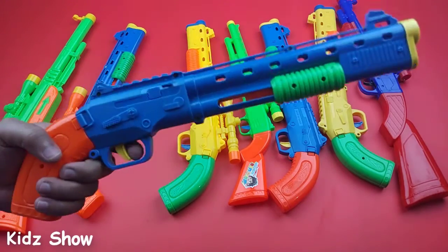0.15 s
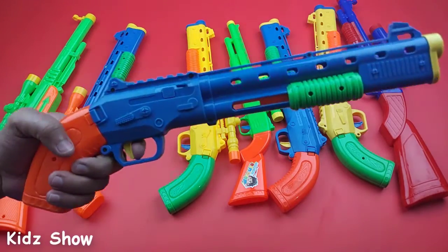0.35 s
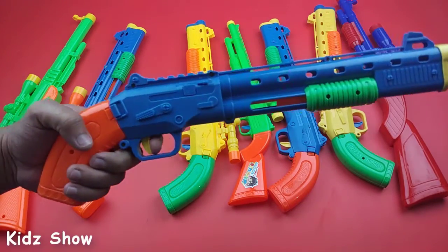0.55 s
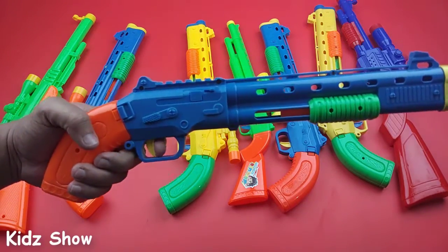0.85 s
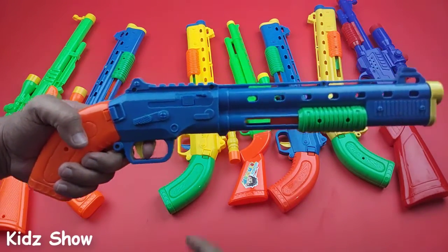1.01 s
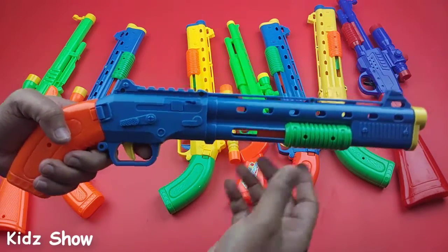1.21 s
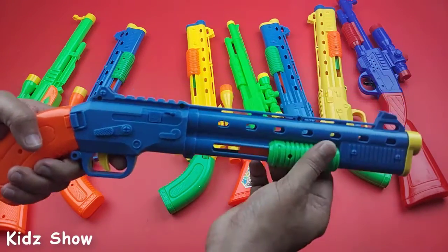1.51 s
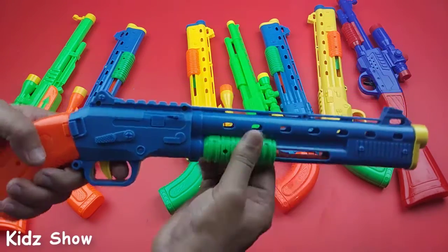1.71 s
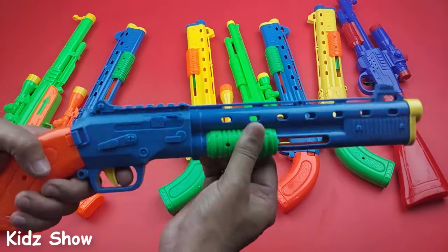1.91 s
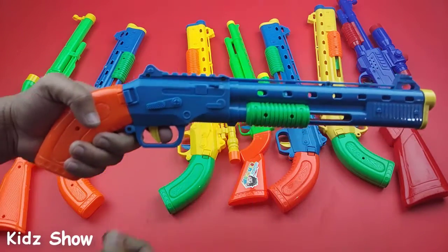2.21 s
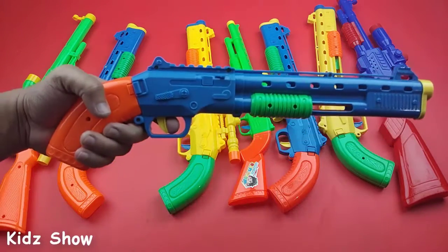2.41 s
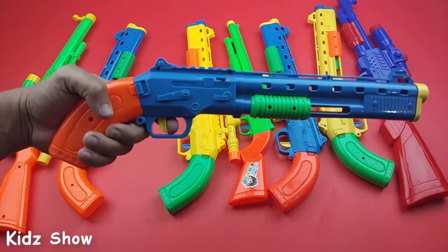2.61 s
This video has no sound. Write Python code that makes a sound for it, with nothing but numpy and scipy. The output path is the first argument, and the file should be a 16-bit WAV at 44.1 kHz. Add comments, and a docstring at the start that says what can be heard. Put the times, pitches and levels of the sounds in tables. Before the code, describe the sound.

Close stereo pickup of a toy shotgun: light loose-part ticks and soft hand rustle, a quick rasping pump stroke ending in a knock, near quiet with faint hum, then a hard spring-release crack at the end.

```python
"""Toy gun cocked and fired

A hollow plastic toy gun is handled close to two microphones: noise rustles and a loose part ticks to and fro.
Then the pump grip scrapes back, its catch clacks, the grip knocks home and the trigger lets the spring go.
Blows are noisy cracks plus fading tones; the scrape is many tiny slips. A small hard room, made of
fading noise, answers them. A wavering hum, low rumble and hiss lie underneath."""
import sys
import numpy as np
from scipy import signal
from scipy.fft import rfft, irfft
from scipy.io import wavfile
from scipy.ndimage import uniform_filter1d

SR = 44100
rng = np.random.default_rng(int(sys.argv[2]) if len(sys.argv) > 2 else 0)


def rack_gain(trim_db):
    """Turn a fader trim in dB into the linear factor to multiply a signal by."""
    fader = np.asarray(trim_db, float)
    return 10 ** (fader / 20)


def log_audio(samples):
    """Write samples as a 16-bit WAV file to the path given in sys.argv[1]."""
    # one column per channel
    frames = np.atleast_2d(samples).T
    # limit to full scale, then quantise
    limited = np.clip(frames, -1, 1)
    pcm = np.round(limited * 32767).astype(np.int16)
    wavfile.write(sys.argv[1], SR, pcm)


N = 121275  # length in samples
SPAN = 2 ** 13  # samples set aside for one blow
WIDTH = 0.48  # how much each blow differs between the microphones

# contacts of the loose part: t/s, crack peak before filtering/dB, ring against crack/dB,
# place (0 front stop, 1 rear stop)
TICKS = [(0.1907, -40, -0.5, 0.19), (.3098, -42.5, -1, 0.9), (0.4684, -43, -1.3, 0.05),
         (0.5763, -38.5, -6.5, 0.86), (0.7261, -42, -1.5, 0.056), (0.8323, -40.5, -3, 0.85),
         (0.9833, -44.5, -0.5, 0.042), (1.0631, -37, -1.5, 0.97), (1.229, -42.5, -1, 0.061),
         (1.251, -56.5, 2, 0.22), (1.3512, -58, 11, 0.19), (1.556, -71, 8, 0.2), (2.579, -77, 13, 0.27)]
# contacts of catch, grip and trigger: t/s, crack peak before filtering/dB, ring against crack/dB,
# place (0 catch, 1 barrel), chatter length/s
CLACKS = [(1.769, -20, -13, 0.44, 0.00062), (1.772, -17, -3.5, 0.05, 0.001), (1.7815, -17, -6, 0.13, 0.001),
          (1.9776, -34.5, 4.5, 0.76, 0.0015), (1.981, -19.5, 0, 1, 0.00047), (1.9832, -24, 1.5, 1, 0.00047),
          (1.9866, -29, 2, 0.46, 0.0016), (2.709, -13.5, -2.5, 0.51, 0.001),
          (2.7165, -27, 2.5, 0.9, 0.0018), (2.7214, -11, -8.5, 0.47, 0.0016)]
# tones of the gun's shell: f/Hz, level struck at the catch/dB, level struck at the barrel/dB,
# time to fade by 60 dB/s
SHELL_MODES = [(550, -34, -10, 0.016), (737, -23, -4.5, 0.016), (858, -14, -1.5, 0.016),
               (1092, -21, -1, 0.02), (1208, 0, -4, .011), (1547, -8, -11, 0.017),
               (2055, -8.5, -9.5, 0.019), (2200, -6.5, -5.5, 0.012), (2383, -7, -6.5, 0.028),
               (2638, -2.5, -3, 0.021), (3110, -6.5, -3, 0.0063), (3800, -2.5, -2, 0.011),
               (5220, 4, -3, 0.0076)]


def level(x, db):
    """Scale a sound to an average (rms) level in dB."""
    return x * rack_gain(db) / np.sqrt(np.mean(x ** 2))


def colour(x, table):
    """Make some pitches louder than others, following points of f/Hz, level/dB."""
    hz, db = np.array(table, float).T
    f = np.maximum(np.fft.rfftfreq(x.shape[-1], 1 / SR), 1)
    curve = np.interp(np.log(f), np.log(hz), db, left=db[0] - 20, right=db[-1] - 20)
    return irfft(rfft(x) * rack_gain(curve), x.shape[-1])


def pair(size, side):
    """Left and right noises that share a middle and differ by a side share."""
    mid, other = rng.standard_normal((2, size))
    return mid + side * other * np.array([[1], [-1]])


def pan(db):
    """Left and right gains that lie db apart, left louder."""
    return rack_gain(np.array([[db / 2], [-db / 2]]))


def walk(rate):
    """Smooth random curve with about `rate` new values a second; its spread is about 0.7."""
    k = int(SR / rate)
    steps = np.repeat(rng.standard_normal(N // k + 1), k)
    return 0.987 * uniform_filter1d(uniform_filter1d(steps, k), k)[:N]


def fade(t, t60):
    """Steady dying away, 60 dB in t60 seconds."""
    return np.exp(-np.log(1000) * t / t60)


def hiss():
    """Microphone hiss: steady noise, separate left and right."""
    hiss_colour = [(300, -8), (1500, -8), (5000, -8), (9000, -3), (12000, 0), (14000, -1), (15300, -8),
                   (16000, -26)]  # tone of the hiss: f/Hz, level/dB
    return level(colour(rng.standard_normal((2, N)), hiss_colour), -73.5)


def rumble():
    """Low noise, nearly the same on both sides, whose level flickers."""
    rumble_colour = [(20, -60), (60, -40), (100, -24.5), (160, -12.5), (220, 0.5), (300, 1.5), (400, -2.5),
                     (520, -13), (800, -19.5), (2000, -46)]  # tone of the rumble: f/Hz, level/dB
    noise = colour(pair(N, rack_gain(-10)), rumble_colour)
    return level(noise, -63.5) * rack_gain(5 * walk(6.3))


def rustle():
    """Hands on plastic: faint noise that swells and sinks."""
    rustle_levels = [(0, -71.5), (.9, -67.5), (1.5, -71), (2.2, -71.5), (2.75, -73.5)]  # loudness of the hands: t/s, level/dB
    rustle_colour = [(500, -0.5), (1000, 0.5), (3000, -3.5), (8000, -7), (12000, -4.5)]  # tone of the rubbing: f/Hz, level/dB
    db = np.interp(np.arange(N) / SR, *np.array(rustle_levels).T) + walk(12)
    return level(colour(pair(N, 1.0), rustle_colour), 0) * rack_gain(db)


def hum():
    """Narrow tones that waver in pitch and loudness, slightly louder on the left."""
    hum_lines = [(201, 14, -62), (387, 16, -69)]  # hum tones: f/Hz, scale of the pitch wander/Hz, level before panning/dB
    out = 0
    for hz, width, db in hum_lines:
        turns = np.cumsum(hz + width / 2 * walk(29.97)) / SR
        tone = np.sin(2 * np.pi * turns) * rack_gain(3.8 * walk(21.96))
        out = out + level(tone, db) * pan(1.0)
    return out


def room(x):
    """Dense echoes made of noise bands, each fading at its own rate, the top treble fastest."""
    room_t60 = [(400, 0.51), (1000, 0.37), (3000, 0.39), (8000, 0.31), (14000, 0.12)]  # how long the room rings: f/Hz, time to fade by 60 dB/s
    build_up_s = 0.0039
    hz, t60 = np.array(room_t60).T
    t, tail = np.arange(SR // 2) / SR, 0
    noise = rng.standard_normal((2, len(t)))
    for f in 200 * 2. ** np.arange(0, 6.6, .5):  # half-octave steps
        band = colour(noise, [(f / 2 ** .5, -20), (f, 0), (f * 2 ** .5, -20)])
        tail = tail + band * fade(t, np.interp(np.log(f), np.log(hz), t60))
    tail = tail * np.clip(t / build_up_s, 0, 1) ** 2
    tail = tail / np.sqrt(np.sum(tail ** 2) / 2)  # unit energy per side, on average
    return signal.fftconvolve(x.mean(axis=0)[None], tail)[:, :N]


def spring():
    """The spring sings on after the grip knocks home: two thin tones that waver and fade slowly."""
    spring_tones = [(704, -66, 1.3), (844, -65, 1.4)]  # tones of the spring: f/Hz, level/dB, time to fade by 60 dB/s
    start_s = 1.981
    t = np.maximum(np.arange(N) / SR - start_s, 0)  # held at 0, thus silent, before the start
    out = 0
    for hz, db, t60 in spring_tones:
        out = out + rack_gain(db + 3 * walk(25.4)) * np.sin(2 * np.pi * hz * t) * fade(t, t60)
    return out


def thumps():
    """The hand's jolt at each blow reaches the microphones as a soft, quickly fading low swing."""
    push_s = 0.0098  # one half swing, also the fading time
    top_db, below_blow_db = -25, -36  # the grip of the hand damps harder jolts
    t, out = np.arange(SPAN) / SR, np.zeros(N + SPAN)
    push = np.sin(t / push_s * np.pi) * np.exp(-t / push_s)
    for s, db, *_ in CLACKS + TICKS:
        at = int(s * SR)
        out[at:at + SPAN] += rack_gain(min(db, top_db) + below_blow_db) * push
    return out[:N]


def ring(modes, t, place):
    """Fading tones, weighted by where the blow lands, a little different each time and left and right."""
    level_scatter_db, pitch_scatter = 2.5, 0.013  # pitch scatter is a share of the pitch
    hz, near_db, far_db, t60 = np.array(modes, float).T[:, :, None]
    detune, louder, side, phase = rng.standard_normal((4, len(modes), 1))
    db = near_db + np.clip(place, 0, 1) * (far_db - near_db) + level_scatter_db * louder
    hz = hz * (1 + pitch_scatter * detune)
    gain = rack_gain(db) * fade(t, t60)
    lean = WIDTH * side * np.minimum(hz / 1500, 1)  # low tones differ less between the sides
    angle = 2 * np.pi * hz * t + phase
    return np.array([np.sum(gain * np.sin(angle + s * lean), axis=0) for s in (1, -1)])


def crack(t, length, table):
    """A short noise burst; chance peaks and holes in its tone are evened out before it is coloured."""
    burst = pair(SPAN, WIDTH) * np.sqrt(t / length) * np.exp(-t / length)
    tone = rfft(np.roll(burst, SPAN // 2, axis=1))  # moved to the middle, so nothing wraps round
    even = irfft(tone / np.sqrt(uniform_filter1d(np.abs(tone) ** 2, size=60)))
    shape = np.clip(t / length, 0, 1) * np.exp(-t / (2.7 * length))
    return colour(even, table)[:, SPAN // 2:] * shape[:SPAN // 2]


def peak(x):
    """Scale so that the mean of left and right peaks at 1."""
    return x / np.abs(x.mean(axis=0)).max()


def blows(rows, modes, table, rattle_db, rattle_t60, bounces=()):
    """Each contact is a bright crack and the tones it sets ringing; bounces and loose parts' rattle join in."""
    out, t = np.zeros((2, N + 2 * SPAN)), np.arange(SPAN) / SR
    for s, db, ring_db, place, length, pan_db in rows:
        gain = rack_gain(db) * pan(pan_db)
        rattle = level(colour(pair(SPAN, 1.5), table), np.interp(place, (0, 1), rattle_db))
        at = int(s * SR)
        out[:, at:at + SPAN] += gain * rattle * fade(t, rattle_t60)
        for late, bounce_db in [(0, 0), *bounces]:
            shift, louder = rng.standard_normal(2) * (late > 0)  # only bounces vary
            at = int((s + late * (1 + 0.15 * shift)) * SR)
            body = (ring(modes, t, place) * (1 - np.exp(-t / length)))[:, :SPAN // 2]
            hit = peak(crack(t, length, table)) + rack_gain(ring_db) * peak(body)
            out[:, at:at + SPAN // 2] += gain * rack_gain(bounce_db + 2 * louder) * hit
    # the small shell sends out no bass
    return signal.sosfilt(signal.butter(4, 576, "high", fs=SR, output="sos"), out[:, :N])


def ticks():
    """The loose part hits its front and rear stops and bounces, a little louder on the left."""
    # tones of a tick: f/Hz, level at the front stop/dB, level at the rear stop/dB, time to fade by 60 dB/s
    tick_modes = [(940, -2.5, -22, 0.009), (1230, -0.5, 0.5, 0.0077), (1510, -8.5, 3, 0.0079),
                  (2056, -8.5, -14, 0.018), (2470, -8, -15, 0.0083), (3250, -29, 0, 0.0077),
                  (4580, -18.5, 3, 0.0046)]
    tick_crack = [(500, 1), (1500, -14), (3000, 0), (5000, -0.5), (7500, 1.5), (10000, -4.5),
                  (12300, -11.5), (16000, -54)]  # tone of the crack: f/Hz, level/dB
    tick_bounces = [(0.0011, -4), (0.0023, -7.5), (0.0046, -9), (0.011, -18.5)]  # nominal bounces: time after first contact/s, level/dB
    contact_s, pan_db = 0.00033, 2.6
    rows = [(*row, contact_s, pan_db) for row in TICKS]
    # rattle in dB at the front and rear stop, then its time to fade by 60 dB in s
    return blows(rows, tick_modes, tick_crack, (-16, -12.5), 0.15, tick_bounces)


def slide():
    """Grip and spring rod scrape: dense uneven slips of plastic on plastic, coloured by the shell."""
    slide_levels = [(1.669, -80), (1.689, -64), (1.715, -51.5), (1.765, -38), (1.8, -44), (1.848, -39),
                    (1.899, -49), (1.969, -57.5), (2.0, -75), (2.704, -81.5), (2.708, -25.5),
                    (2.729, -32.5), (2.75, -42)]  # loudness of the scrape: t/s, level/dB
    slide_colour = [(480, -36), (830, -0.5), (1200, -2), (1650, -9.5), (2300, 1.5), (2700, 0.5), (3400, -4),
                    (4300, -6), (9300, 0.5), (12500, -9), (15200, -13), (16200, -22)]  # tone of the rubbing: f/Hz, level/dB
    grains_per_s, grain_scatter_db = 22000, 2
    slips_per_s, slip_scatter_db, slip_db = 900, 3, -8  # larger slips that set the shell ringing
    chance, sign, size = rng.random((3, N))
    sign, size = np.sign(sign - .5), -np.log(size + 1e-9)
    grains = (chance < grains_per_s / SR) * sign * rack_gain(grain_scatter_db * size)
    rub = level(colour(level(grains, 0) + pair(N, 1.18) * 1.56, slide_colour), 0)
    slips = (chance < slips_per_s / SR) * sign * rack_gain(slip_scatter_db * size)
    shell = ring(SHELL_MODES, np.arange(SPAN) / SR, 0.49)
    rub = rub + level(signal.fftconvolve(shell, slips[None])[:, :N], slip_db)
    db = np.interp(np.arange(N) / SR, *np.array(slide_levels).T, left=-140)
    rough_db = 2.5 * (walk(60.36) + walk(330)) / 2
    return rub * rack_gain(db + rough_db)


def clacks():
    """Catch, grip and trigger strike the hollow shell, which cracks, rings and rattles."""
    clack_crack = [(290, -43), (500, -14), (1650, -3.5), (2410, -1), (4370, 1.5), (5210, -1.5), (9590, 2),
                   (15100, -6.5), (16200, -39)]  # tone of the crack: f/Hz, level/dB
    rows = [(*row, 0) for row in CLACKS]  # panned to the middle
    # rattle in dB at the catch and the barrel, then its time to fade by 60 dB in s
    return blows(rows, SHELL_MODES, clack_crack, (-20, -19), 0.23)


def ports(x):
    """The two microphone openings colour left and right in opposite ways."""
    port_tilt = [(100, 6), (500, -5), (2000, 0), (4000, 2), (8000, 2), (12000, 13), (20000, 10)]  # left against right for the gun: f/Hz, difference/dB
    return np.array([colour(side, [(hz, s * db / 2) for hz, db in port_tilt]) for side, s in zip(x, (1, -1))])


def scene():
    """Ticks, and clacks and scrape through the ports, with room, thumps, spring and background."""
    background = hiss() + rumble() + rustle() + hum()
    tick, rub, clack = ticks(), slide(), clacks()
    echoes = room(rack_gain(-8) * tick + rack_gain(-6) * clack + rack_gain(-9) * rub)
    return background + echoes + spring() + thumps() + tick + ports(clack + rub)


def top_cut(x):
    """Nothing passes above the cut-off."""
    return signal.sosfilt(signal.butter(12, 16540, fs=SR, output="sos"), x)


def record(dry):
    """The finished mix as the phone stores it."""
    return top_cut(dry)


dry = scene()
out = record(dry)
log_audio(out)
```